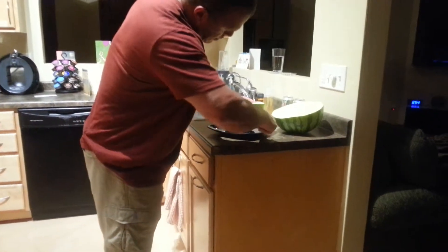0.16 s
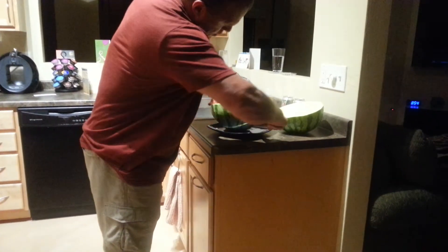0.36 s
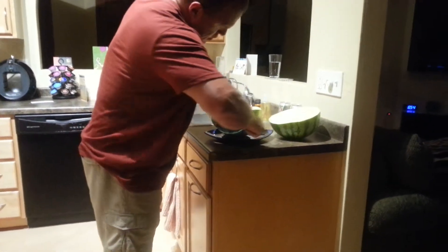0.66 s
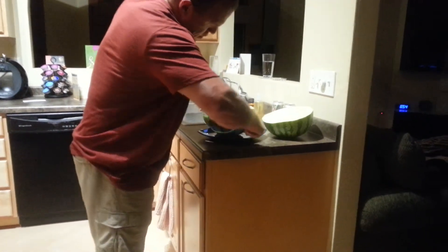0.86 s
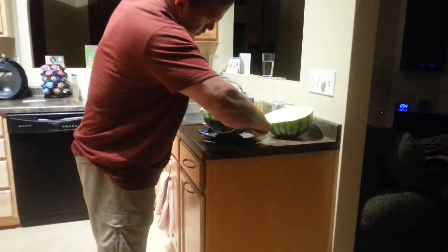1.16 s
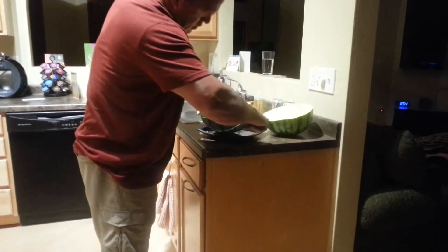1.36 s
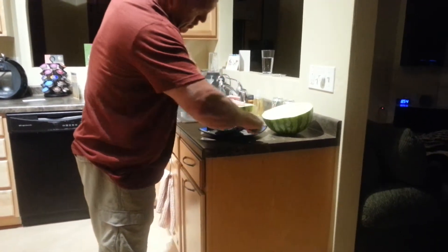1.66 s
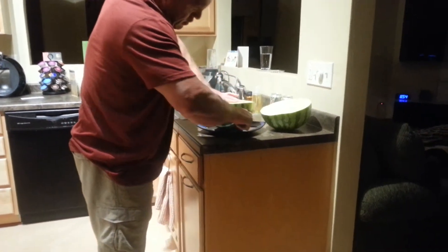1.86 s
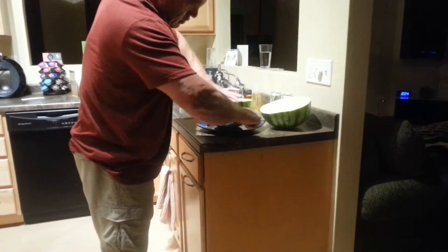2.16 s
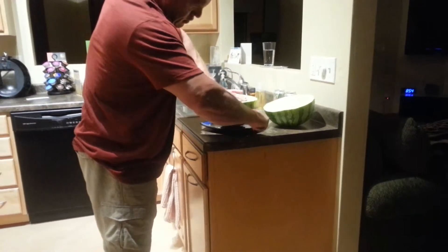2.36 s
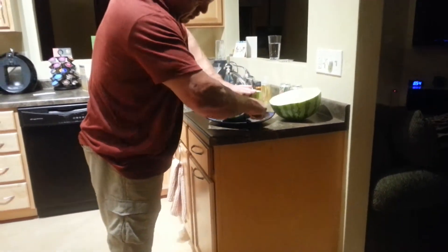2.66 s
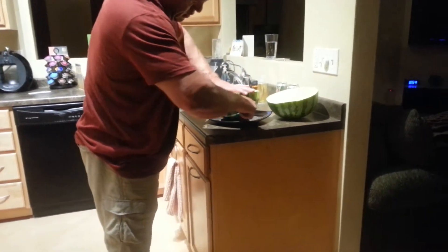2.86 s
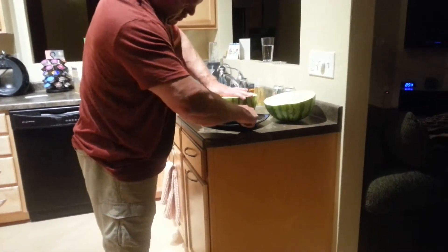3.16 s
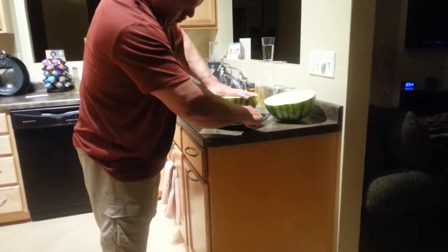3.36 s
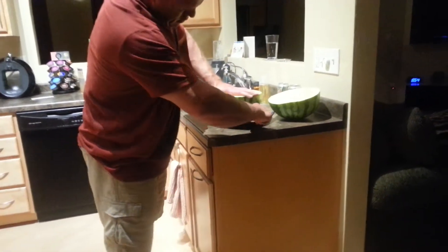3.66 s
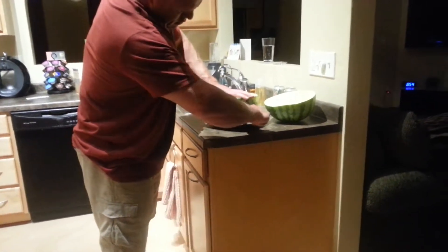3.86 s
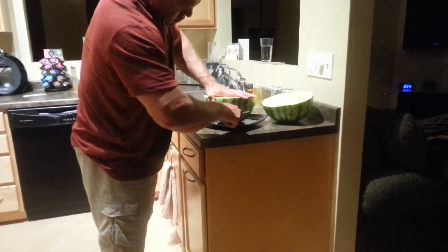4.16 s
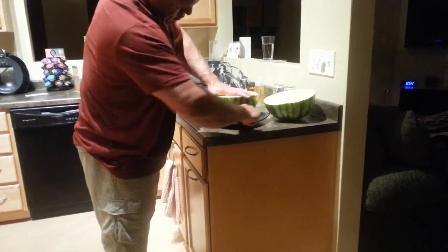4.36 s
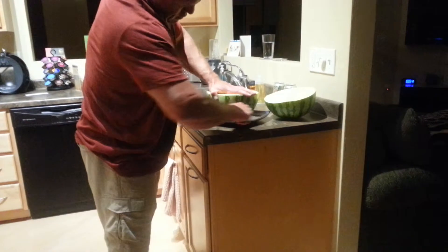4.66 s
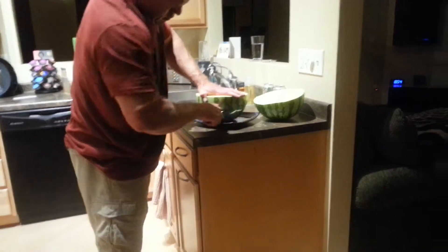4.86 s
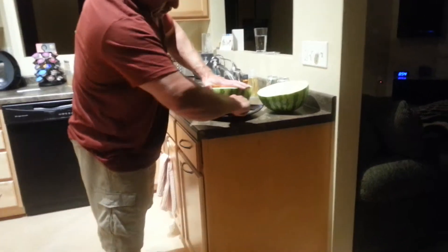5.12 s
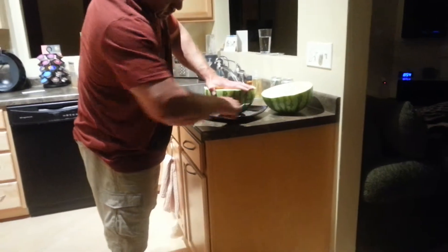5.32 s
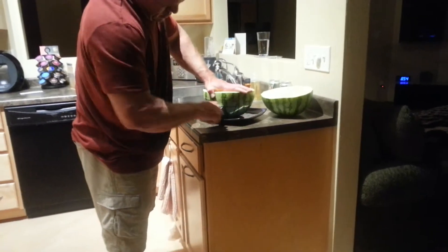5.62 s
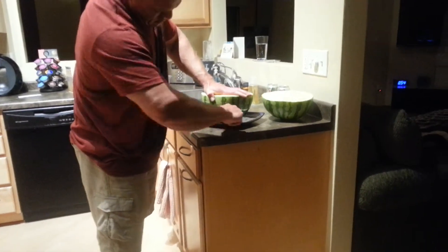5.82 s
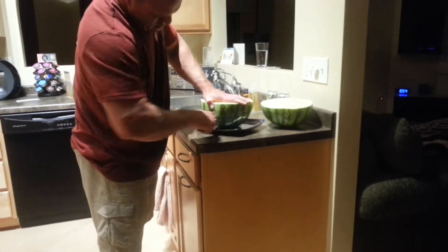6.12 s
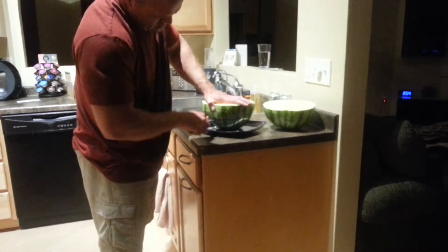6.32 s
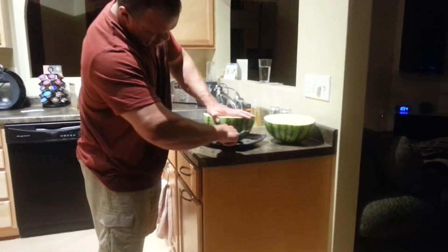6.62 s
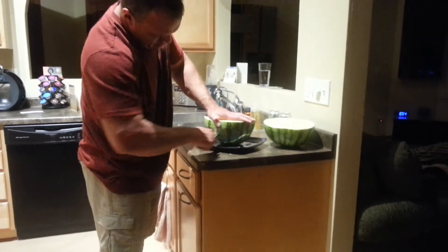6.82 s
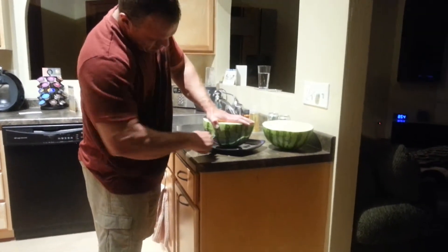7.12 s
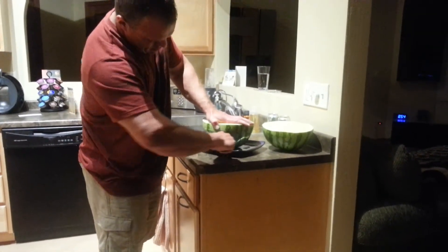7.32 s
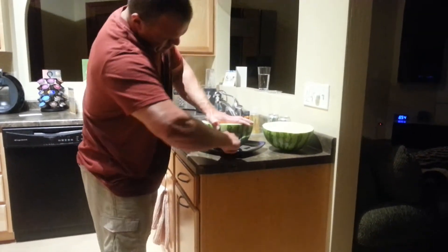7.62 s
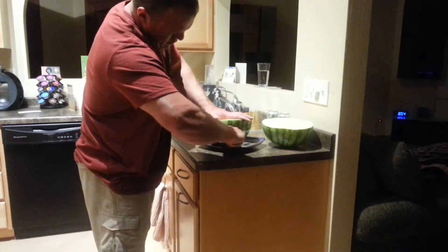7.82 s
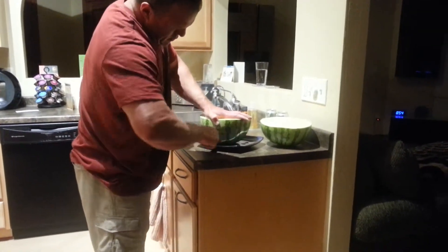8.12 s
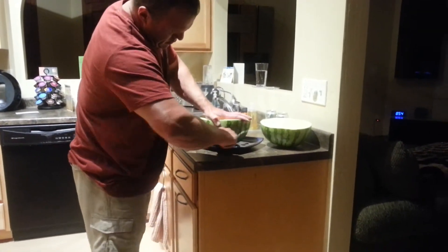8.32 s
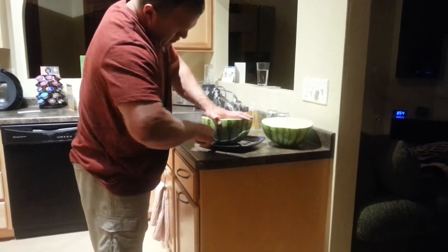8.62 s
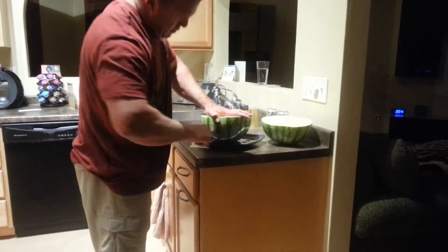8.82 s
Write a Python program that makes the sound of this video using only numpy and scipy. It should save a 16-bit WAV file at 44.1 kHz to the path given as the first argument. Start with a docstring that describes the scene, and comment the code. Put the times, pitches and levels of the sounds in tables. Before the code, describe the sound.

Short juicy sawing strokes cut melon rind in a kitchen; one hard plate clack rings out early, with dull thumps and small handling creaks.

```python
"""A knife saws through a watermelon on a plate, a few steps away in a kitchen with a humming fridge.
Each stroke drives thousands of random grains, coloured as rasping rind, squelching pulp and fizzing juice.
Crunches, a squeak and dull rumble go with it; blade and plate clack, the melon bumps on the counter.
A hand-held shell around two microphones clicks once and its grip creaks, loudest at the right one:
damped modes for the click, filtered pushes for the creaks. Noise and fluttering tones form the background."""
import sys
import numpy as np
from scipy import signal
from scipy.fft import rfft, irfft
from scipy.io import wavfile
from scipy.ndimage import uniform_filter1d

SR = 44100
rng = np.random.default_rng(int(sys.argv[2]) if len(sys.argv) > 2 else 0)


def waveform_to_disk(signal):
    """Save audio, clipped to [-1, 1], as 16-bit WAV at the path in sys.argv[1]."""
    frames = np.transpose(np.atleast_2d(signal))
    scaled = np.clip(frames, -1, 1) * 32767
    samples = np.round(scaled).astype(np.int16)
    wavfile.write(sys.argv[1], SR, samples)


N = 396018
TIME = np.arange(N) / SR

# hard clacks of blade and plate:
# (time [s], relative level [dB], treble tilt [dB/octave], depth of the resonance [ratio])
CLACK_BLOWS = [(0.2925, -36, 0, .9), (1.378, -3, -.7, 1.03), (1.7665, -33, 3, .7), (1.8677, -13.5, 3.2, .7),
               (6.2050, -33, 1, .8)]
# melon bumps on the plate: (time [s], relative level [dB], hardness as tilt [dB/octave])
BUMP_BLOWS = [(0.225, -43.5, 0), (0.601, -35, 0), (0.826, -41, 1), (0.937, -42, 1), (1.16, -44, 0),
              (1.742, -38, -4), (2.567, -33, 0.5), (2.831, -38, 4), (3.585, -35, -2), (3.625, -36, -4),
              (3.972, -36, -1), (4.215, -43, -1), (4.445, -43, -2), (4.811, -36.5, -1), (5.152, -37.5, -1),
              (5.433, -36.5, -3), (5.525, -41, -1), (5.932, -40, 0), (6.205, -40, -2), (6.487, -37.5, 0),
              (6.85, -36, -1), (6.91, -40, 0), (7.587, -36.5, 2), (7.909, -35.5, -1), (8.304, -37.5, 3)]
# creaks of the hand-held grip: (time [s], relative level [dB], relative sharpness [Hz])
GRIP_CREAKS = [(0.98, -35, 460), (1.8059, -28, 390), (1.841, -30.5, 410), (2.3994, -26.5, 378),
               (2.676, -27, 380), (2.7024, -29.5, 740), (2.7133, -31, 430), (2.7265, -35, 550),
               (3.5905, -31.5, 890), (3.604, -35, 500), (3.68, -29, 497), (3.9758, -33.5, 400),
               (4.0491, -34, 400), (6.4837, -28, 520), (6.5223, -29.5, 480), (6.5487, -27, 590),
               (6.5817, -33.5, 400), (6.886, -34, 460), (6.9206, -26, 580), (6.9335, -33, 370),
               (6.9688, -30, 430), (6.9887, -37.5, 350), (7.1336, -31.5, 400), (7.2052, -34, 390),
               (8.3093, -38, 500), (8.9325, -32, 373)]
# level difference of the two microphones: (frequency [Hz], left minus right [dB])
MIC_BALANCE = [(60, 1), (200, 0.5), (700, 2), (1300, 1), (2300, 2), (3500, 4), (4500, 6.5), (5600, 2.5),
               (6400, 0.5), (7300, -5.5), (9500, -3.5), (14000, -7)]


def gain_of(db):
    """Decibels to amplitude."""
    return 10 ** (np.asarray(db) / 20)


def evened(x):
    """Scales to rms 1."""
    return x / np.sqrt(np.mean(x ** 2) + 1e-20)


def read(points, hz):
    """Interpolates a table on a log-frequency axis."""
    f, value = np.transpose(points)
    return np.interp(np.log(hz + 1), np.log(f + 1), value)


def add(mix, s, sound):
    """Adds a sound of several channels at time s."""
    part = mix[:, max(round(s * SR), 0):][:, :sound.shape[1]]
    part += sound[:, :part.shape[1]]


def heard(x, colour, rings=(), ripple_db=1.5, ripple_bins=900):
    """Colours two unrelated signals as a diffuse sound at the two microphones, rms 1."""
    # likeness of the two microphones: (frequency [Hz], correlation [ratio])
    likeness = [(60, 0.55), (130, 0.89), (280, 0.82), (620, 0.31), (1350, 0.016), (3000, 0.072), (14000, 0)]
    hz = np.fft.rfftfreq(N, 1 / SR)
    a, b = rfft(x)
    same = np.clip(read(likeness, hz), -1, 1)
    balance = gain_of(read(MIC_BALANCE, hz) / 2)
    right = same * a + np.sqrt(1 - same ** 2) * b
    pair = np.array([a * balance, right / balance])
    ring_db = sum(db / (1 + (2 * (hz - f) / width) ** 2) for f, width, db in rings)
    # near walls ripple the spectrum, less so in the bass
    ripple = evened(uniform_filter1d(rng.standard_normal(len(hz)), ripple_bins)) * hz / (hz + 800)
    return evened(irfft(pair * gain_of(read(colour, hz) + ring_db + ripple_db * ripple), N))


def drift(max_hz):
    """A random wander of rms 1, limited to slow frequencies."""
    return evened(irfft(rfft(rng.standard_normal(N)) * (np.fft.rfftfreq(N, 1 / SR) < max_hz), N))


def grains(per_s, spread_db):
    """Random tiny bursts of uneven size and random sign, for two channels."""
    size = gain_of(spread_db * np.minimum(rng.exponential(1, (2, N)), 4))
    sign = rng.choice([-1, 1], (2, N))
    return evened(size * sign * (rng.random((2, N)) < per_s / SR))


def room_tail(build_s):
    """Dense reflections of energy 1 that build up, then die band by band."""
    # kitchen decay: (frequency [Hz], t60 [s])
    decay = [(200, 0.31), (1000, 0.83), (2600, 0.55), (7000, 0.42), (14000, 0.36)]
    hz, t, z = signal.stft(rng.standard_normal((2, SR * 3 // 4)), SR, nperseg=256)
    z = z * gain_of(-60 * t / read(decay, hz)[:, None])
    tail = signal.istft(z, SR, nperseg=256)[1]
    tail = tail * (1 - np.exp(-np.arange(tail.shape[1]) / SR / build_s))
    return tail / np.linalg.norm(tail[0])


def background():
    """Room air as coloured noise; fridge tones and a thin electric whine, each fluttering in level."""
    # room air: (frequency [Hz], colour [dB])
    air = [(20, -1), (45, -17), (65, -19), (150, 1), (300, -5.5), (500, -8.5), (900, -15.5), (1300, -20),
           (3000, -19), (4800, -16), (6500, -14.5), (8000, -21.5), (11000, -26.5), (13500, -25.5),
           (14500, -37)]
    # steady tones: (frequency [Hz], left level [dB], right level [dB], fluttering share [0-1])
    tones = [(60.2, -73, -73, .2), (120.2, -65.5, -63.5, .25), (360.6, -60, -63.5, .3), (306, -71, -69, .6),
             (437, -74, -72, .6), (735, -79, -79, .7), (914, -78, -79, .7), (9989, -84, -74, .15)]
    out = gain_of(-55.5) * heard(rng.standard_normal((2, N)), air)
    for hz, left_db, right_db, share in tones:
        share = np.clip(share, 0, 1)
        flutter = drift(max_hz=7) + 1j * drift(max_hz=7)
        swing = np.sqrt(2 - 2 * share) + np.sqrt(share) * flutter
        tone = (swing * np.exp(2j * np.pi * hz * TIME)).real
        out = out + gain_of([[left_db], [right_db]]) * tone
    return out


def shell_click():
    """The hand-held shell snaps once by the right microphone: heavily damped modes, dry and close."""
    # shell modes: (frequency [Hz], swell time [ms], left level [dB], right level [dB], delay [ms])
    modes = [(5735, .19, -23, -2.3, .11), (4460, .12, -13, -7.4, .01), (7450, .1, -27.5, -11.9, .31),
             (10330, .09, -38, -12.2, .03), (7750, .1, -29, -12.8, .64), (1715, .4, -24.4, -14.4, .58),
             (2300, .18, -12.5, -30, .5), (1110, .66, -37.4, -28.6, .63)]
    out, ms = np.zeros((2, N)), np.arange(SR // 50) * 1000 / SR
    travel_ms = np.array([[.22], [0]])  # the left microphone hears it later
    for hz, swell_ms, left_db, right_db, delay_ms in modes:
        age_ms = np.maximum(ms - delay_ms - travel_ms, 0)
        envelope = age_ms / swell_ms * np.exp(1 - age_ms / swell_ms)
        ring = envelope * np.sin(2 * np.pi * hz * age_ms / 1000)
        add(out, 0.7215, gain_of([[left_db], [right_db]]) * ring)
    return out


def creaks():
    """Each slip of the grip pushes mostly the right microphone, which swings back; the case rings briefly."""
    out, t = np.zeros((2, N)), np.arange(-220, 220) / SR
    for s, db, sharpness in GRIP_CREAKS:
        push = 1 / (1 + (t * sharpness * 4.84) ** 2) ** 2
        add(out, s + t[0], gain_of(db + np.array([[-17], [5.0]])) * push)
    swing_hz, damping, case_hz, case_q = 160, 1.16, 354, 6.6
    w = 2 * np.pi * swing_hz
    out = signal.lfilter(*signal.bilinear([1, 0, 0], [1, w * damping, w ** 2], SR), out)
    return out + 1.25 * signal.lfilter(*signal.iirpeak(case_hz, case_q, SR), out)


def bumps():
    """Soft blows ring the melon and the counter under it as decaying, detuned modes."""
    # ring of melon, plate and counter: (nominal frequency [Hz], relative level [dB], t60 [s])
    modes = [(134.2, -7, 0.15), (191, -4, 0.12), (268.5, -5, 0.077), (390, -2.5, 0.087), (542, -7.5, 0.053),
             (690, -9, 0.029)]
    out, t = np.zeros((2, N)), np.arange(SR // 4) / SR
    for s, db, tilt_db in BUMP_BLOWS:
        detune = 1 + 0.074 * rng.standard_normal(len(modes))
        ring = np.zeros(len(t))
        for (hz, mode_db, t60_s), ratio in zip(modes, detune):
            level_db = mode_db + tilt_db * np.log2(hz / 250) - 60 * t / t60_s
            ring += gain_of(level_db) * np.sin(2 * np.pi * (hz * ratio * t + rng.random()))
        ring *= 1 - np.exp(-t / 0.0034)  # the flesh gives, so the blow takes a moment
        paths = 0.32 * room_tail(build_s=0.0087)
        paths[:, 0] += 1
        add(out, s, gain_of(db - 2.5) * signal.fftconvolve(ring[None], paths, axes=1))
    return out


def clacks(size=1024):
    """Very short bright blows of blade and plate, thrown back by the walls."""
    # clack: (frequency [Hz], colour [dB])
    colour = [(150, -34), (900, -26), (1500, -23), (2000, -19.5), (3000, -14), (4100, -7), (5200, -2),
              (6000, -1), (7200, -5), (8500, -15.5), (10000, -21.5), (11700, -32), (12600, -52),
              (15000, -60)]
    # direct sound and first reflections: (delay [ms], left gain [ratio], right gain [ratio])
    reflections = [(0, 1.1, 1.0), (.6, .35, .4), (3.6, .2, .35), (7.25, 1.2, .3), (8.8, .35, .15),
                   (14.4, .5, .2), (15.6, .7, .8), (25, .3, .3)]
    out, hz = np.zeros((2, N)), abs(np.fft.fftfreq(size, 1 / SR))
    balance_db = np.outer([.5, -.5], read(MIC_BALANCE, hz))
    for s, db, tilt_db, depth in CLACK_BLOWS:
        tilt = tilt_db * np.log2(np.maximum(hz, 1000) / 5500)
        colour_db = depth * read(colour, hz) + tilt + balance_db
        # minimum phase makes the pulse causal
        spectrum = np.exp(signal.hilbert(np.log(gain_of(colour_db))).conj())
        blow = np.fft.ifft(spectrum).real
        paths = gain_of(9.5) * room_tail(build_s=0.0059)
        for ms, left, right in reflections:
            paths[:, round(ms * SR / 1000)] += left, right
        add(out, s, gain_of(db + 11.0) * signal.fftconvolve(blow, paths, axes=1))
    return out


def rumble(rind):
    """Small dull jolts that follow the push of each stroke and gather around every blow."""
    # rumble: (frequency [Hz], colour [dB])
    colour = [(30, -25), (60, -2), (120, -4), (185, 4.5), (280, -8), (400, -2), (600, -10), (900, -12.5),
              (1600, -47)]
    push_db, steadying_hand_db = -5.5, -65  # before the common trim below
    power = (gain_of(push_db) * rind[None]) ** 2 + gain_of(steadying_hand_db) ** 2
    # pressure builds before a blow and ebbs after it
    lead_s, ebb_db_per_s = 0.022, 72
    t = np.arange(-SR // 4, SR) / SR
    shudder = np.exp(np.minimum(t, 0) / lead_s) * gain_of(-ebb_db_per_s * np.maximum(t, 0))
    # shudder of fruit and hands against the listed level of each blow, dB
    for blows, share_db in (BUMP_BLOWS, -14.5), (GRIP_CREAKS, -22), (CLACK_BLOWS, -41):
        for s, db, *_ in blows:
            add(power, s + t[0], (gain_of(db + share_db) * shudder[None, s + t >= 0]) ** 2)
    return gain_of(-2.0) * np.sqrt(power) * heard(grains(per_s=700, spread_db=2.5), colour)


def squeak():
    """The wet rind squeaks on the blade: a brief unsteady stick-slip tone."""
    # squeak, one row: centre time [s], length between 1/e points [s], mean pitch [Hz], relative level [dB]
    s, length_s, hz, db = (3.176, .035, 2550, -51)
    wander = np.array([drift(max_hz=200), drift(max_hz=200)])
    turns = np.cumsum(hz * (1 + .025 * wander), axis=1) / SR
    envelope = np.exp(-(2 * (TIME - s) / length_s) ** 2)
    return gain_of(db + 2) * envelope * np.sin(2 * np.pi * turns)


def crunches():
    """A row of rind cells gives way at once: milliseconds of dense snaps and a little room."""
    # rind cracks: (time [s], length, four times the rise [s], relative level [dB])
    cracks = [(0.83, .008, -50), (2.404, .008, -50), (2.7, 0.0045, -41.5), (3.58, 0.01, -45),
              (3.588, 0.011, -37.5), (3.603, .003, -35.5), (3.609, 0.0061, -41), (3.633, 0.0069, -39.5),
              (5.07, .008, -45), (5.154, .004, -41.5), (5.36, .012, -45), (5.429, 0.0054, -46),
              (5.922, 0.004, -52), (6.204, .008, -42), (7.81, 0.01, -50), (8.138, 0.0071, -50)]
    # crunch: (frequency [Hz], colour [dB])
    colour = [(300, -16), (900, -9), (1500, -3.5), (3000, -1), (4800, 2), (6500, -1), (7800, 0.5),
              (9000, -10), (13000, -26)]
    gate = np.zeros(N)
    for s, length_s, db in cracks:
        age = np.maximum(TIME - s, 0) * 4 / length_s
        gate += gain_of(db) * age * np.exp(1 - np.minimum(age, 60))
    snaps = gate * heard(grains(per_s=6000, spread_db=2), colour)
    room = signal.fftconvolve(snaps, room_tail(build_s=0.0065), axes=1)[:, :N]
    return snaps + gain_of(-10.5) * room


def stroke_levels():
    """Levels of rind, pulp and juice over time: each stroke swells as the blade bites, holds, dies away."""
    # knife strokes: (start [s], time to bite [s], length before release [s], relative rasp level [dB],
    # pulp against rasp [dB], juice against rasp [dB]), the last two before layer trims
    strokes = [(0, 0.0054, 0.03, -55.5, -10, -5.5), (0.275, .025, 0.12, -51, -7.5, -8.5),
               (0.52, 0.19, 0.23, -52, -5.5, -9), (0.817, .01, 0.013, -64, 5, -8),
               (.86, .1, .14, -58, -6.5, -9), (1.17, 0.018, 0.028, -61.5, -12, -9),
               (1.314, 0.053, .07, -54, -11, -10), (1.655, .14, 0.23, -49.5, -8, -6),
               (2.078, .025, 0.03, -55.5, -11, -9), (2.156, .02, 0.025, -60, -5, -10),
               (2.263, 0.027, 0.19, -60.5, -6.5, -10), (2.48, 0.061, 0.12, -55, -5.5, -7),
               (2.64, .05, 0.068, -53.5, -7, -6.5), (2.824, .14, 0.16, -53, -5, -10.5),
               (3.125, 0.076, 0.073, -47.5, -5.5, -8.5), (3.347, .02, 0.16, -61.5, -9, -12),
               (3.548, 0.033, 0.12, -54, -5, -10), (3.691, 0.033, 0.1, -54.5, -6.5, -10),
               (3.954, 0.021, 0.077, -58.5, -3, -9), (4.066, 0.05, 0.12, -51.5, -11, -6.5),
               (4.315, 0.035, 0.14, -54.5, -9, -9), (4.501, .015, 0.027, -55.5, -14, -9.5),
               (4.57, 0.017, 0.14, -62, -10, -8), (4.729, 0.046, .14, -53, -8.5, -7.5),
               (4.955, .04, 0.11, -58, -11, -7), (5.057, 0.024, 0.063, -49.5, -5.5, -8.5),
               (5.332, 0.11, 0.2, -47.5, -9, -9), (5.676, 0.16, 0.26, -52, -9, -10),
               (6.053, .055, 0.13, -56.5, -7, -6.5), (6.178, .025, 0.09, -48.5, -10.5, -7.5),
               (6.441, 0.11, 0.15, -52, -8, -9), (6.676, .05, .09, -60.5, -7, -10),
               (6.798, 0.071, 0.16, -50, -7, -6.5), (7.016, .02, 0.056, -58.5, -18, -12),
               (7.105, .02, .04, -59, -6.5, -10), (7.167, 0.016, .19, -55, -10, -7),
               (7.424, .02, .06, -64, -8, -10), (7.583, .01, 0.019, -65, 0.5, -10),
               (7.638, .015, 0.023, -60, -14, -9), (7.775, .03, 0.03, -53.5, -8, -6.5),
               (7.932, 0.087, .2, -53.5, -6.5, -8.5), (8.261, .04, 0.12, -52.5, -9.5, -8.5),
               (8.585, 0.062, 0.075, -50.5, -10.5, -7), (8.815, .025, .05, -59.5, -10, -5),
               (8.902, .03, .08, -57, -4, -8)]
    bite_power, release_db_per_s = 0.77, 131
    power, age = np.zeros((3, N)), np.arange(SR) / SR
    for s, bite_s, length_s, db, pulp_db, juice_db in strokes:
        bite = np.minimum(age / bite_s, 1) ** bite_power
        release = gain_of(-release_db_per_s * np.maximum(age - length_s, 0))
        levels = gain_of([[db], [db + pulp_db], [db + juice_db]])
        add(power, s, (levels * bite * release) ** 2)
    return np.sqrt(power)


def crackle(level, bursts, colour, rings=()):
    """Bursts follow a level while the blade catches and slips, and take on a colour."""
    catch = gain_of(1.02 * drift(max_hz=66))
    return np.sqrt(np.mean(level ** 2)) * heard(bursts * level * catch, colour, rings)


def sawing(rind, pulp, juice):
    """Cells burst under the blade: rind rasps, pulp squelches, juice fizzes."""
    # colours of rind, pulp and juice: (frequency [Hz], colour [dB])
    rasp_colour = [(1200, -31), (2600, -8), (3500, -4.5), (4700, 1), (5700, -0.5), (6500, 0), (7600, -7.5),
                   (9000, -26.5), (12000, -38)]
    squelch_colour = [(300, -5), (600, 0), (1000, -0.5), (1550, 1), (2000, -1), (2600, -2), (3600, -9),
                      (6000, -32)]
    fizz_colour = [(5000, -30), (7000, -5), (8200, 3), (9500, -1.5), (11000, -4.5), (13000, -8.5),
                   (14500, -40)]
    # narrow resonances under rasp and squelch: (frequency [Hz], width [Hz], boost [dB])
    resonances = [(2520, 110, 2), (3990, 160, 1.5), (4880, 200, 3), (6470, 170, 2), (7900, 150, -3)]
    stirred = np.hypot(rind, gain_of(-68))  # the blade stirs in the cut between strokes
    rasp = crackle(gain_of(3.0) * stirred, grains(per_s=7000, spread_db=3.0), rasp_colour, resonances)
    squelch = crackle(gain_of(3.5) * pulp, grains(per_s=3000, spread_db=3.0), squelch_colour, resonances)
    fizz = crackle(gain_of(3.0) * juice, grains(per_s=9000, spread_db=1.0), fizz_colour)
    return rasp + squelch + fizz


def scene():
    """Sums all layers at the two microphones."""
    rind, pulp, juice = stroke_levels()
    surroundings = background() + shell_click() + creaks()
    blows = bumps() + clacks() + rumble(rind)
    cutting = squeak() + crunches() + sawing(rind, pulp, juice)
    return surroundings + blows + cutting


def record(dry):
    """The microphones lose the deepest bass; then the full-scale limit and the band limit."""
    bass_cut = signal.sosfilt(signal.butter(2, 42, "highpass", fs=SR, output="sos"), dry)
    edge_hz = 14600
    band_limit = signal.firwin(511, edge_hz, window=("kaiser", 9), fs=SR)
    return signal.oaconvolve(np.clip(bass_cut, -1, 1), band_limit[None], "same")


dry = scene()
out = record(dry)
waveform_to_disk(out)
```